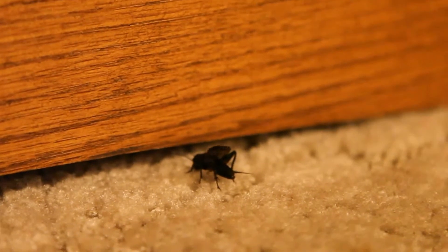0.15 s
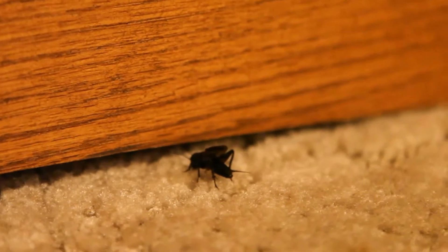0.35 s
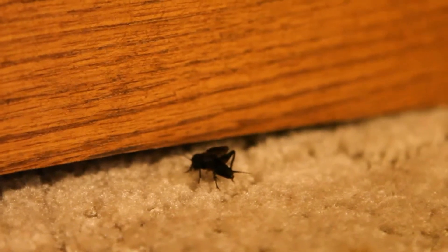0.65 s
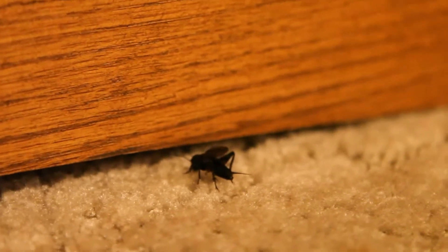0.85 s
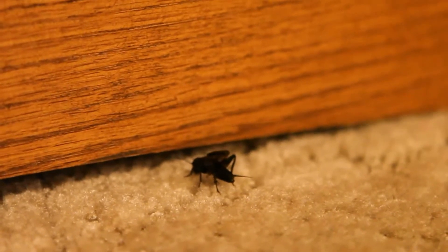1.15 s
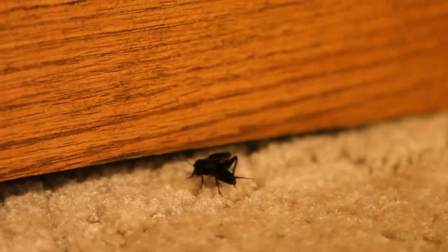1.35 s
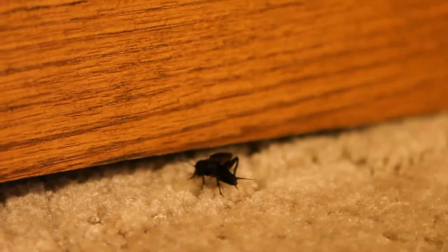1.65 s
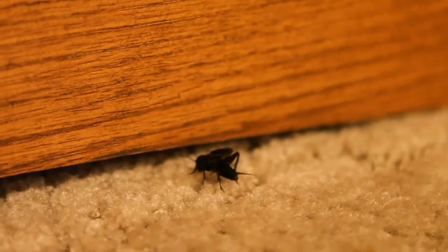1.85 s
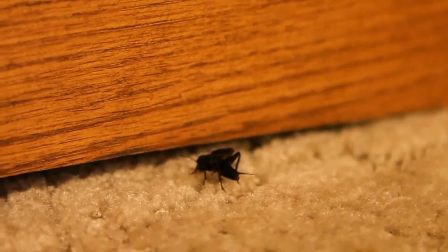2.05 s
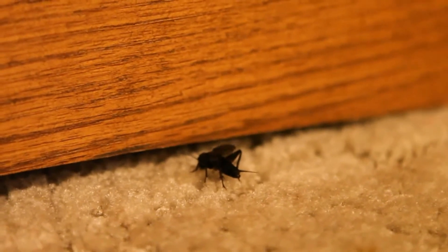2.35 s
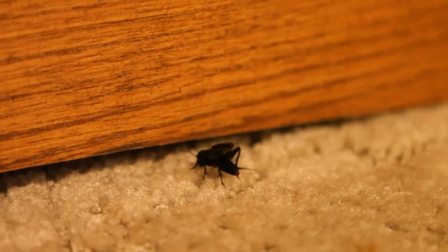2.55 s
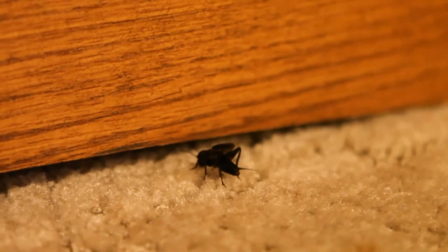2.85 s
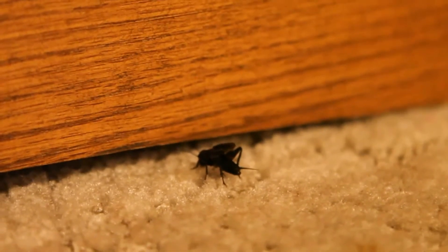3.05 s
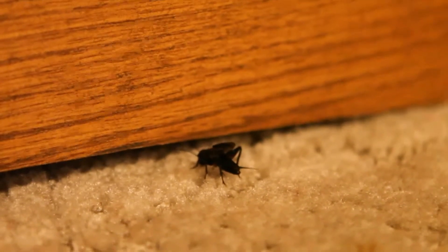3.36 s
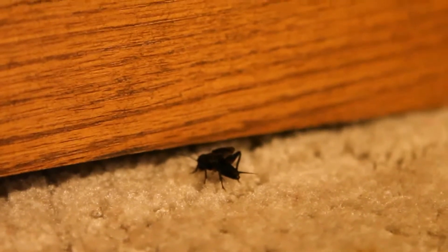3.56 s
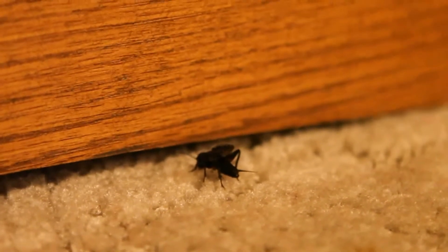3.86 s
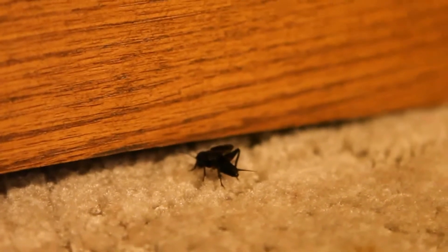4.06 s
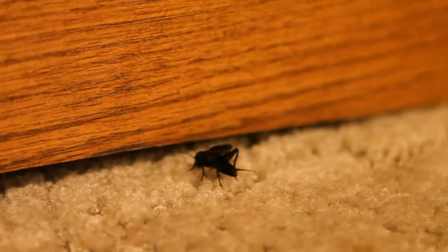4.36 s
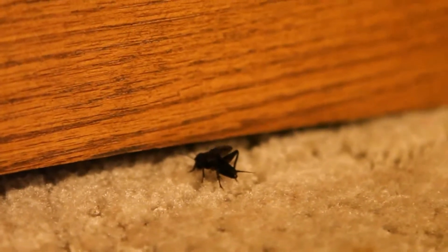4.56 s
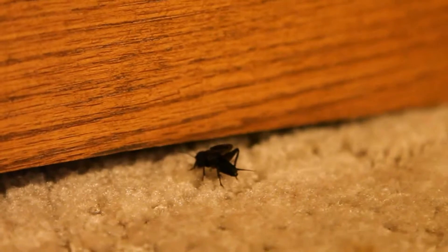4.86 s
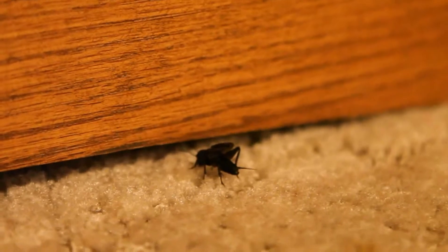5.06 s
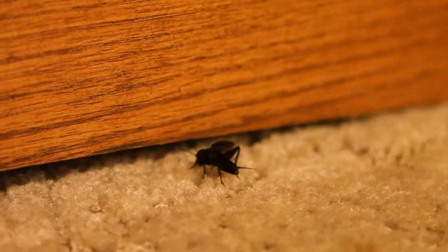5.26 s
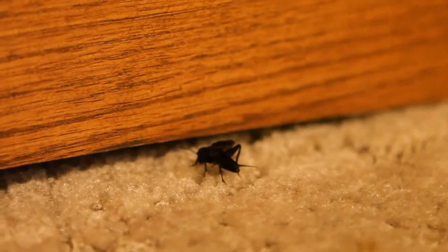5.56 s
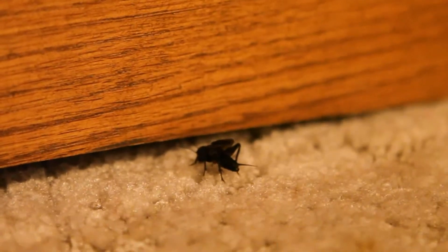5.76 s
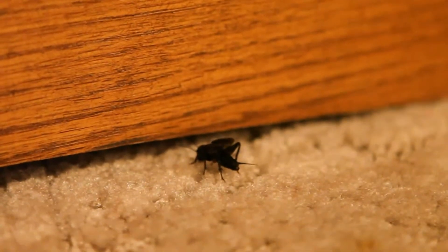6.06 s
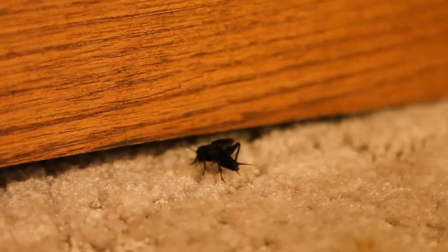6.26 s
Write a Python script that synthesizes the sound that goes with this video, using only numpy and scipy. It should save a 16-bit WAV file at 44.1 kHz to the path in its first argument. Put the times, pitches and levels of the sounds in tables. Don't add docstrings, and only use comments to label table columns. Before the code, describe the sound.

Quiet carpeted room, closely miked cricket. Sharp, bright, nearly whistled chirps come every half to nine tenths of a second, each a weak flick followed by three strong pulses packed into a fraction of a second. Tiny dry wing rasps surround the pulses, and nearby board and walls return a brief bright tail. Between chirps only a faint, slightly beating hum, soft hiss and thin electronic whine remain.

```python
import sys
import numpy as np
from scipy import signal
from scipy.fft import rfft, irfft
from scipy.io import wavfile

SR = 44100
rng = np.random.default_rng(int(sys.argv[2]) if len(sys.argv) > 2 else 0)


def linear_from_db(decibels):
    return 10 ** (np.asarray(decibels, float) / 20)


def digitize_waveform(pressure):
    field = np.atleast_2d(pressure).T
    bounded = np.clip(field, -1, 1)
    quanta = np.round(bounded * 32767).astype(np.int16)
    wavfile.write(sys.argv[1], SR, quanta)


N = 282240


def band(x, low_hz, high_hz, order=2):
    return signal.sosfilt(signal.butter(order, [low_hz, high_hz], "band", fs=SR, output="sos"), x)


def rms_one(x):
    return x / np.sqrt(np.mean(x ** 2) + 1e-20)


def drift(rate_hz):
    r = np.exp(-2 * np.pi * rate_hz / SR)
    settled = signal.lfilter([1], [1, -2 * r, r * r], rng.standard_normal(N + SR))[SR:]
    return rms_one(settled)


def add(track, s, sound):
    at = round(s * SR)
    track[at:at + len(sound)] += sound


def tone(hz, db):
    phase = 2 * np.pi * np.cumsum(hz * np.ones(N)) / SR + rng.uniform(0, 7.1)
    return np.sqrt(2) * linear_from_db(db) * np.sin(phase)


# f/Hz, level/dB per Hz
HISS = [(15, -45), (25, -17), (120, -6), (168, -7.5), (465, -12.5), (1810, -15.5), (1950, -15.5),
        (2540, -16.5), (3040, -16), (3290, -17), (7200, -18.5), (7790, -19.5), (12800, -25), (16600, -63.5),
        (22000, -120)]
HISS_DB, QUIET_CUT_HZ = -59, 12800


def hiss():
    hz = np.maximum(np.arange(N // 2 + 1) * SR / N, 1)
    point_hz, point_db = np.transpose(HISS)
    colour = linear_from_db(np.interp(np.log(hz), np.log(point_hz), point_db)) * (hz < QUIET_CUT_HZ)
    return linear_from_db(HISS_DB) * rms_one(irfft(rfft(rng.standard_normal(N)) * colour, N))


# f/Hz, rms level/dB, wobble/Hz
HUM = [(58.44, -69, .03), (116.9, -80, .05), (120.0, -67, .01), (175.3, -77, .15), (236, -82, 1.5)]
# t/s, f/Hz, rms level/dB
MOTOR = [(0, 110.6, -70), (1.4, 111.4, -71.5), (2.6, 111.7, -70.5), (3.8, 111.6, -68.5), (5.0, 112.3, -69),
         (6.4, 114, -71)]


def hum():
    s, motor_hz, motor_db = np.transpose(MOTOR)
    t = np.arange(N) / SR
    steady = sum(tone(hz + wobble * drift(0.81), db + 1.3 * drift(3.4)) for hz, db, wobble in HUM)
    return steady + tone(np.interp(t, s, motor_hz), np.interp(t, s, motor_db))


# f/Hz, rms level/dB
WHINE = [(1953.2, -76), (4882.8, -81), (6199.6, -79.5), (6836.4, -85), (7735.5, -76.5), (7919, -79),
         (8277.7, -83), (8397.7, -85.5), (8757.9, -84.5), (8791, -90), (8997.6, -91), (9117.6, -81.5),
         (9238, -83.5), (9357.4, -77.5), (9765.6, -88)]
# multiple of its rate, rms level/dB
WHIRR = [(2, -74.5), (3, -79), (4, -76), (5, -72)]
WHIRR_HZ = 1535.1


def whine():
    speed_hz = WHIRR_HZ * (1 + 0.0013 * drift(25))
    electronics = sum(tone(hz, db) for hz, db in WHINE)
    return electronics + sum(tone(k * speed_hz, db) for k, db in WHIRR)


# level/dB, t60/s, build-up/s, top f/Hz
ROOM = [
    (-17.5, 0.16, .012, 7000),
    (-23, 0.33, 0.014, 7100),
]


def room(x):
    t = np.arange(round(.6 * SR)) / SR
    response = 0
    for db, t60, build_up, top_hz in ROOM:
        tail = rng.standard_normal(len(t)) * linear_from_db(-60 * t / t60) * np.clip(t / build_up, 0, 1) ** 2
        unit_energy = tail / np.sqrt(np.sum(tail ** 2))
        response = response + linear_from_db(db) * band(unit_energy, 2500, top_hz, order=1)
    return signal.fftconvolve(x, response)[:N]


# t/s, length/ms, time to crest/ms, crest level/dB
STROKES = [(0.2663, 13.1, 0.6, -12.0), (0.3098, 15.3, 5.2, -8.4), (0.935, 14.5, 3.6, -10.8),
           (0.9818, 11.6, 4.5, -8.7), (1.7897, 12.6, 0.1, -13.8), (1.8475, 11.9, 0.1, -17.0),
           (2.3945, 13.6, 3.0, -11.3), (2.4382, 14.6, 5.7, -9.0), (3.0067, 13.7, 2.5, -9.4),
           (3.0527, 11.9, 5.1, -9.2), (3.9324, 11.0, 0.1, -13.8), (3.973, 15.4, 4.4, -9.9),
           (4.5792, 13.9, 2.4, -12.2), (4.6239, 12.9, 4.8, -9.4), (5.3047, 13.1, 0.1, -13.0),
           (5.3467, 14.2, 5.3, -9.1), (6.0047, 14.4, 3.3, -11.5), (6.0484, 13.4, 5.9, -8.8)]
# t/s, length/ms, time to crest/ms, crest level/dB, braking (1 = usual)
LAST_STROKES = [
    (0.3589, 13.0, 5.8, -8.0, 3.5),
    (1.0299, 13.6, 5.7, -8.9, .8),
    (1.89, 12.7, 3.5, -9.1, .72),
    (2.489, 13.1, 5.3, -8.6, .9),
    (3.1038, 13.5, 5.6, -8.7, .85),
    (4.0204, 8.6, 2.0, -11.0, 2.6),
    (4.6726, 18.0, 5.7, -9.7, .95),
    (5.3972, 11.7, 4.9, -8.7, 1.05),
    (6.0982, 13.5, 5.9, -8.0, .85),
]
# flick t/s, length/ms, crest level/dB, lift f/Hz, lift level/dB
FLICKS = [
    (0.2379, 4.6, -21, 4410, -37),
    (0.9062, 4.3, -21.5, 4270, -37),
    (1.7588, 5.2, -20, 4450, -46.5),
    (2.3667, 3.7, -21.5, 4500, -41),
    (2.978, 5.2, -21, 4770, -35.5),
    (3.9049, 3.4, -25, 4350, -38),
    (4.551, 4.5, -21, 4040, -37.5),
    (5.2761, 4.6, -21.5, 4340, -39),
    (5.977, 4.4, -22.5, 4320, -38),
]
FULL_EFFORT_DB, FULL_PITCH_HZ, PITCH_HZ_PER_DB = -8, 5527.6, 28.5
SAG_HZ, SAG_HZ_PER_CREST_MS, SAG_HZ_PER_DB, FLICK_SAG_HZ = 8.3, .8, 0.72, 13
STALL_HZ_PER_MS, FULL_RUN_UP_MS = 17, 6


def crest_pitch(db):
    return FULL_PITCH_HZ + PITCH_HZ_PER_DB * (db - FULL_EFFORT_DB)


def full_stroke(s, length, crest, db, braking=1):
    sag_hz = SAG_HZ + SAG_HZ_PER_CREST_MS * crest + SAG_HZ_PER_DB * (db - FULL_EFFORT_DB)
    stall_hz = STALL_HZ_PER_MS * (braking - 1) * (FULL_RUN_UP_MS - crest)
    return s, length, crest, db, crest_pitch(db) - stall_hz, braking * sag_hz


def chirps():
    rows = []
    for flick, second, third, last in zip(FLICKS, STROKES[::2], STROKES[1::2], LAST_STROKES):
        s, length, db = flick[:3]
        first = (s, length, 0, db, crest_pitch(db), FLICK_SAG_HZ)
        rows.append([first, full_stroke(*second), full_stroke(*third), full_stroke(*last)])
    return rows


def lifts():
    out, rough, wobble = np.zeros(N), drift(500), drift(300)
    scratch = rms_one(band(rng.standard_normal(N), 4300, 10500))
    ms = np.arange(0, 28, 1000 / SR)
    for flick_s, _, _, top_hz, db in FLICKS:
        s = flick_s - .0275
        here = slice(round(s * SR), round(s * SR) + len(ms))
        hz = top_hz - 1000 * np.exp(-ms / 2.6) - 12 * ms + 110 * wobble[here]
        phase = 2 * np.pi * np.cumsum(hz) / SR
        shape = (1 - np.exp(-ms / 2.5)) * np.exp(-(ms / 8.7) ** 2)
        timbre = np.sin(phase) + linear_from_db(-7) * np.sin(2 * phase) + linear_from_db(-11) * scratch[here]
        add(out, s, linear_from_db(db + 1.5 * rough[here]) * shape * timbre)
    return out


# t from that stroke/ms,
# upper partial level/dB at full effort, upper partial f/Hz, lower partial level/dB
OPENINGS = [
    (-23, -40.5, 7700, -42),
    (-18, -48.5, 6900, -42),
    (-22, -35.5, 7150, -41.5),
    (-21.5, -36.5, 7450, -42),
    (26, -48, 6700, -44.5),
]
OPENING_FOLLOWS = .8
OPENING_SCATTER_DB, OPENING_SCATTER_HZ = 3, 129.8


def openings():
    out = np.zeros(N)
    rough, wobble, white = drift(600), drift(400), rng.standard_normal(N)
    low, broad = rms_one(band(white, 3920, 5300)), rms_one(band(white, 6000, 9300))
    ms = np.arange(-12, 22, 1000 / SR)
    for chirp in chirps():
        for stroke, (offset_ms, upper_db, upper_hz, lower_db) in zip(chirp + chirp[-1:], OPENINGS):
            s = stroke[0] + offset_ms / 1000
            here = slice(round(s * SR), round(s * SR) + len(ms))
            chance = rng.standard_normal(3)
            upper_db += OPENING_FOLLOWS * (stroke[3] - FULL_EFFORT_DB) + OPENING_SCATTER_DB * chance[0]
            arch = 1.03 - 0.078 * np.tanh((ms / 2.2) ** 2) + 0.051 * wobble[here]
            phase = 2 * np.pi * np.cumsum((upper_hz + OPENING_SCATTER_HZ * chance[1]) * arch) / SR
            upper = linear_from_db(upper_db + 1.3 * rough[here]) * np.exp(-(ms / 3.6) ** 2) * np.sin(phase)
            grain = low[here] * np.exp(-((ms - 5.5) / 8.9) ** 2)
            grain += linear_from_db(-5.5) * broad[here] * np.exp(-((ms - .6) / 6) ** 2)
            grain_db = lower_db + OPENING_SCATTER_DB * chance[2] - 7 + 3.1 * rough[here]
            add(out, s - .012, upper + linear_from_db(grain_db) * grain)
    return out


# multiple of the clock, level/dB
CLOCK_MIX = [(-1, -35.5), (1, -38.5), (-2, -48), (2, -53)]
CLOCK_HZ = 3906.25
JOLT_DB, CATCH_JOLT_DB = 2.5, 3


def closing_strokes():
    out, rasps, mixed = np.zeros((3, N))
    flutter, wobble, scrape = drift(350), drift(500), band(rng.standard_normal(N), 4160, 9300)
    strokes = [stroke for chirp in chirps() for stroke in chirp]
    for s, length, crest, crest_db, crest_hz, sag_hz in strokes:
        ms = np.arange(round((length + 6) * SR / 1000)) * 1000 / SR
        here = slice(round(s * SR), round(s * SR) + len(ms))
        before = np.clip(1 - ms / max(crest, .1), 0, 1)
        sag = sag_hz * np.clip(ms - crest, 0, None) ** 1.8
        hz = crest_hz - 125 * crest * before ** 3.9 - sag
        hz = np.maximum(hz, 4850)
        hz += 1700 * np.exp(-(ms / 0.6) ** 2) + 25 * wobble[here]
        phase = 2 * np.pi * np.cumsum(hz) / SR

        attack = (1 - np.exp(-(ms / .59) ** 2)) * (1 - .15 * np.exp(-ms / .64))
        release = linear_from_db(-5.8 * np.clip(ms - length + 1.1, 0, None))
        envelope = attack * release
        no_run_up = np.exp(-crest / .8)
        level_db = crest_db - .65 * crest * before ** 1.5 - 7.9 * (np.abs(sag) / 400) ** 1.23
        level_db += .35 * flutter[here] + JOLT_DB * no_run_up * np.exp(-ms / 1.8)
        add(out, s, envelope * linear_from_db(level_db) * np.sin(phase))

        overtone = linear_from_db(0.17 * level_db - 31.5 + 0.99 * wobble[here]) * np.sin(2 * phase)
        overtone *= (1 - np.exp(-(ms / 1.1) ** 2)) * release / (1 + np.exp((4900 - hz) / 70))
        catch = linear_from_db(-28 + CATCH_JOLT_DB * no_run_up) * np.exp(-ms / 2.5)
        catch += linear_from_db(-33.5) * np.exp(-((ms - length + 0.5) / 0.9) ** 2)
        rasp_db = 0.28 * crest_db + 5.5 * np.tanh(.7 * flutter[here]) + 1.5 * rng.standard_normal()
        rasp = linear_from_db(rasp_db) * (catch + linear_from_db(-45.5) * release)
        add(rasps, s, envelope * overtone + rasp * scrape[here])

        clock = 2 * np.pi * CLOCK_HZ * (ms / 1000 + s)
        shifted = sum(linear_from_db(db) * np.sin(phase + k * clock) for k, db in CLOCK_MIX)
        add(mixed, s, envelope * linear_from_db(1.223 * level_db + 2) * shifted)
    return out, rasps, mixed


def scene():
    song, rasps, mixed = closing_strokes()
    wing_edge = signal.butter(6, 4040, "high", fs=SR, output="sos")
    song, rasps = signal.sosfilt(wing_edge, [song, rasps + openings() + lifts()])
    wet = room(song + linear_from_db(9) * rasps)
    return (song + rasps + wet + mixed + hum() + whine() + hiss())[None]


def roll_off(x):
    return signal.sosfilt(signal.butter(12, 13690, fs=SR, output="sos"), x)


def record(dry):
    low_pass = signal.ellip(10, .3, 70, 12900, fs=SR, output="sos")
    mix = signal.sosfilt(low_pass, dry)
    return roll_off(mix)


dry = scene()
out = record(dry)
digitize_waveform(out)
```